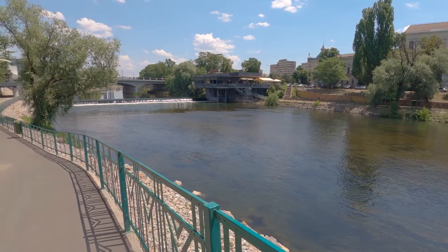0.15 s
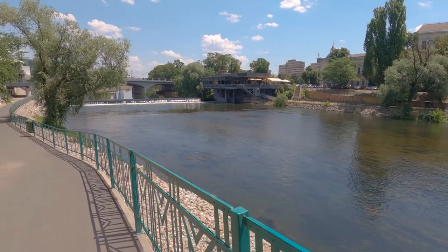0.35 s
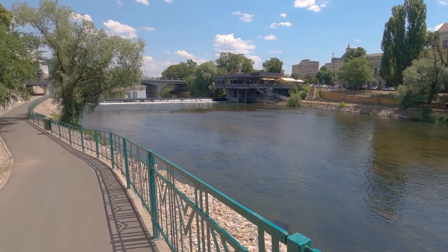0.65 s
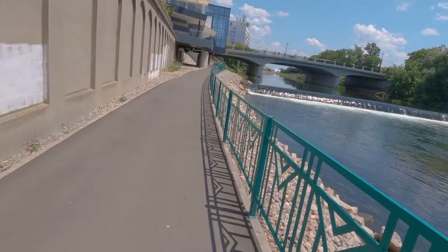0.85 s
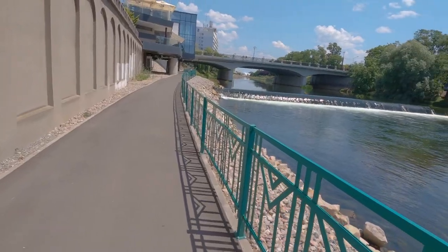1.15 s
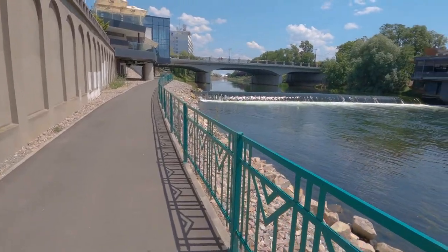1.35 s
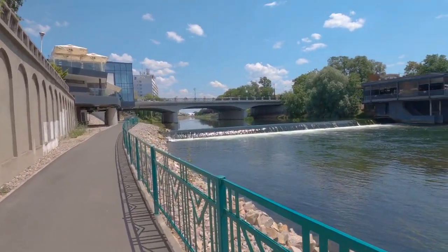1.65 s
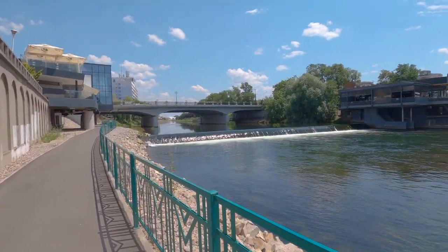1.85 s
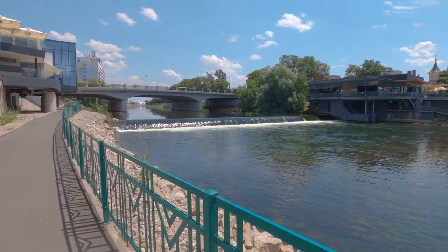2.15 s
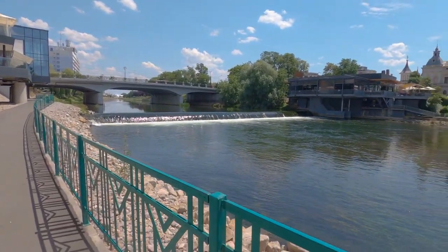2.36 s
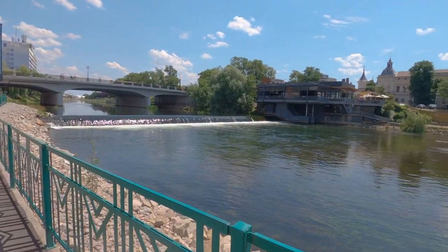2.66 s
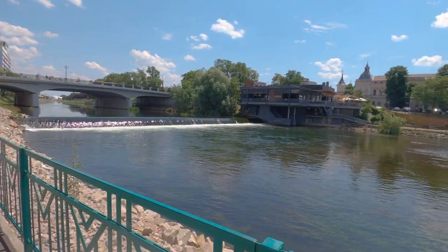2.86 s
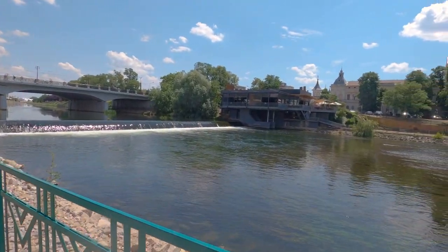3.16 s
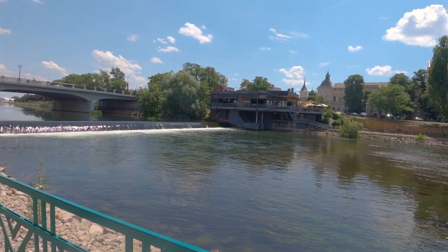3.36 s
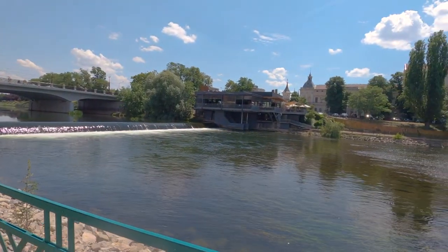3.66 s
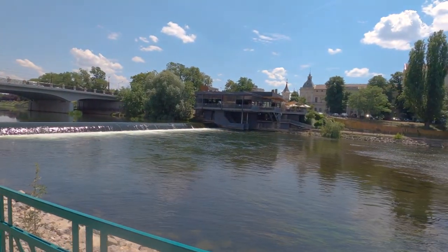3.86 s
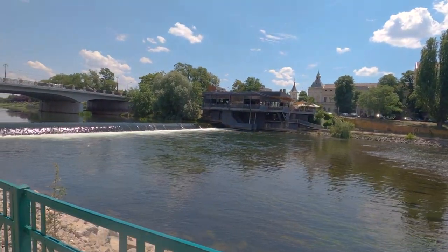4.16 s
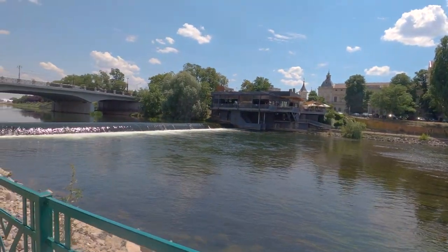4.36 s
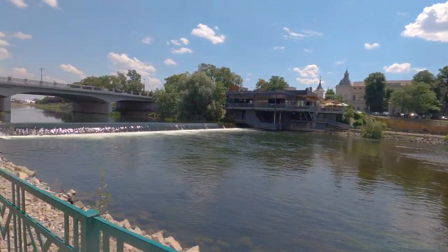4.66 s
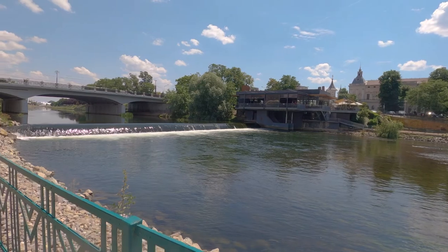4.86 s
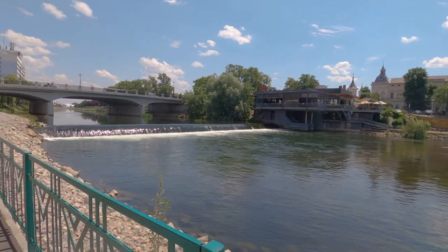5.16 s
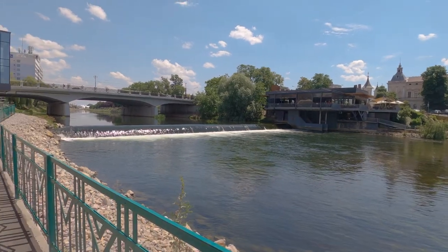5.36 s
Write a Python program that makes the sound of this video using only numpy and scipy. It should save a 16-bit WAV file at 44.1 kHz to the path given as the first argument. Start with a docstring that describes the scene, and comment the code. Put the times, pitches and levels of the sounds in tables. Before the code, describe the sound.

For the first 0.8 seconds, a river weir is heard from a distance as a thin, dull rush over low town rumble. The sound falls to near-silence, then at about 1 second the weir fades in quickly, much closer: a smooth roar of water with fizzing spray above it. It opens loud and bright and settles to a steady, lower level by about 2.5 seconds. Beneath it, traffic rumbles and an engine on a bridge holds a low, wavering drone, strongest around 2 seconds and again near 3.6. At about 1.2 seconds a brief scuffing swish passes nearby with one dry tick. A very faint, short high pip sounds at about 4 seconds. The traffic rumble swells briefly three times between 4.3 and 5 seconds, while the water grows very slightly louder until the end at about 5.5 seconds.

```python
"""A city river. From the far bank, town rumble and the thin rush of a weir, dulled by air absorption.
After a short near-silence the walker stands closer: countless bubbles merge into a roar, spray fizzes,
and an engine on the bridge drones at its firing frequency over traffic rumble. The near sound opens
loud and bright, then settles. A swish with a dry tick passes early on, a faint high pip later."""
import sys
import numpy as np
from scipy import signal
from scipy.io import wavfile
from scipy.ndimage import uniform_filter1d

SR = 44100
rng = np.random.default_rng(int(sys.argv[2]) if len(sys.argv) > 2 else 0)


def persist_wave(psi):
    """Save psi, clipped to +-1, as 16-bit WAV."""
    counts = np.round(np.clip(psi, -1, 1) * 32767).astype(np.int16)
    wavfile.write(sys.argv[1], SR, np.atleast_2d(counts).T)


N = 242991
T = np.arange(N) / SR
FAR_END_S, NEAR_START_S = 0.7712, 0.948


def gain_of(db):
    """Amplitude ratio of a level: a factor of ten per 20 dB."""
    return 10 ** (np.asarray(db) / 20)


def unit_rms(x):
    """Normalisation to unit mean power."""
    return x / np.sqrt(np.mean(x ** 2) + 1e-20)


def level_at(spectrum, hz):
    """Level in dB, interpolated on a logarithmic frequency axis."""
    f, db = np.transpose(spectrum)
    return np.interp(np.log(hz + 1), np.log(f + 1), db)


def resonate(x, hz, width):
    """Resonance by heterodyning: shift hz down to zero, low-pass, shift back."""
    carrier = np.exp(2j * np.pi * np.cumsum(hz * np.ones(len(x))) / SR)
    pole = np.exp(-np.pi * width / SR)
    return 2 * (carrier * signal.lfilter([1 - pole], [1, -pole], x / carrier)).real


def band(x, hz, width):
    """Three equal resonances in cascade give a steep pass band."""
    return resonate(resonate(resonate(x, hz, width), hz, width), hz, width)


def settle(db, extra_db, hold_s, tau_s):
    """Gain whose excess level holds as the near sound opens, then relaxes exponentially."""
    return gain_of(db + extra_db * np.exp(-np.maximum(T - NEAR_START_S - hold_s, 0) / tau_s))


def bumps(rows, half_s):
    """Superposed Gaussian changes of level, in dB."""
    return sum(db * np.exp(-((T - s) / half_s) ** 2) for s, db in rows)


# Passing coloration as the near water opens: f/Hz, gain/dB
OPENING_COLOUR = [(100, -6.5), (300, 1.5), (560, -4), (900, 0), (1500, 0.4), (2150, 2), (2600, 3),
                  (4500, 3.5), (5500, 8), (7000, -0.8), (8000, -2.5), (10300, -1), (11000, -7),
                  (14000, -14)]

def rush(*spectra, size, patchy_db=0, flicker_db=0, opens=False):
    """Spectrally shaped Gaussian noise, modulated by drifting patches and a broadband flicker."""
    hop = size // 4
    hz = np.fft.rfftfreq(size, 1 / SR)
    t = np.arange(N // hop + 5) * hop / SR
    real, imag, patches = rng.standard_normal((len(t), len(hz), 3)).T
    patches = uniform_filter1d(patches, size=size // 100, axis=0)
    patches = unit_rms(uniform_filter1d(patches, size=3000 // hop, axis=1))
    db = sum(level_at(spectrum, hz) for spectrum in spectra)[:, None]
    db = db + patchy_db * patches + flicker_db * rng.standard_normal(len(t))
    if opens:
        db += level_at(OPENING_COLOUR, hz)[:, None] * np.exp(-np.maximum(t - NEAR_START_S, 0) / 0.88)
    _, noise = signal.istft((real + 1j * imag) * gain_of(db), nperseg=size, noverlap=size - hop)
    return unit_rms(noise[:N])


# Spectra of the distant roar and of town rumble: f/Hz, relative level/dB
FAR_ROAR_SPECTRUM = [(44, -29.5), (80, -8), (100, -15.5), (125, -4.5), (170, -8.5), (340, -9.5),
                     (490, -20.5), (740, -6.5), (900, -11), (1130, -20), (1380, -17.5), (1850, -33),
                     (2170, -29.5), (2500, -41.5), (3200, -70.5), (5500, -120)]
RUMBLE_SPECTRUM = [(10, -36), (20, -14), (32, -5), (52, -1), (66, 0), (90, -12), (130, -38.5), (400, -120)]
# The water's high hiss as coloured by the microphone, shared by both places: f/Hz, relative level/dB
TREBLE_COLOUR = [(1100, -37), (1900, -20.5), (2500, -3), (4600, -1.16), (5250, -11.5), (6000, -15.5),
                 (7150, -11), (8060, -19.5), (8750, -14.5), (9900, -22.5), (10800, -28), (12300, -27.5),
                 (14200, -45), (14900, -55)]
# Treble loss over the long path: f/Hz, gain/dB
AIR_ABSORPTION = [(2000, -0.8), (6000, 0.5), (8500, -6), (10100, -3.5), (10700, -12), (12500, -14.5),
                  (13000, -23)]

def far_bank():
    """Ground-echo interference notches the roar and air absorption dulls the fizz, over town rumble."""
    roar = rush(FAR_ROAR_SPECTRUM, size=2048)
    fizz = rush(TREBLE_COLOUR, AIR_ABSORPTION, size=512, patchy_db=0.5, flicker_db=0.8)
    rumble = rush(RUMBLE_SPECTRUM, size=4096, patchy_db=1.0, flicker_db=3.1)
    return gain_of(-35) * roar + gain_of(-55.5) * fizz + gain_of(-37.5) * rumble


# Spectrum of the roar close by: f/Hz, relative level/dB
NEAR_ROAR_SPECTRUM = [(56, -32), (90, -8.5), (118, -9.5), (168, -8.5), (284, -12.5), (440, -11),
                      (570, -14.5), (780, -11.5), (950, -16.5), (1250, -22), (1600, -26), (1860, -36),
                      (2170, -31), (2400, -46), (3100, -69), (5500, -120)]

def weir():
    """Incoherent summation: countless bubbles merge into a smooth roar, with spray fizzing above."""
    roar = rush(NEAR_ROAR_SPECTRUM, size=2048, patchy_db=0.6, flicker_db=0.52, opens=True)
    roar *= settle(db=-29, extra_db=7.5, hold_s=0.23, tau_s=0.5)
    fizz = rush(TREBLE_COLOUR, size=512, patchy_db=0.54, flicker_db=0.63, opens=True)
    fizz *= settle(db=-48.5, extra_db=8, hold_s=0.13, tau_s=0.46)
    approach = gain_of(0.6 * np.maximum(T - 4.15, 0))  # 0.6 dB/s as the walker comes closer
    return approach * (roar + fizz)


# Wavering firing tone: t/s, f/Hz, level/dB
FIRING_TONE = [(1.0, 82.5, -29), (1.13, 87.7, -26.5), (1.37, 87.1, -26), (1.6, 82.7, -31),
               (1.77, 84.3, -25.5), (2.03, 83.34, -22.5), (2.36, 83.4, -25), (2.55, 82.6, -32),
               (3.12, 82.7, -32), (3.62, 83.8, -24), (3.78, 83.8, -28.5), (3.98, 85.2, -26.5),
               (4.65, 85.8, -28.5), (5.1, 87, -31), (5.51, 87, -30.5)]
# Brief dips in that tone: t/s, gain/dB
TONE_DIPS = [(1.23, -18), (1.47, -12), (1.61, -13), (1.88, -4), (2.17, -9), (2.87, -12.5), (3.71, -7),
             (4.79, -10), (5.28, -12), (5.44, -8)]

def engine():
    """Periodic firing gives a tone; uneven running spreads a skirt of noise sidebands around it."""
    times, pitches, levels = np.transpose(FIRING_TONE)
    hz = np.interp(T, times, pitches)
    db = np.interp(T, times, levels) + bumps(TONE_DIPS, half_s=0.036)
    tone = np.sqrt(2) * np.sin(2 * np.pi * np.cumsum(hz) / SR)
    skirt = resonate(rng.standard_normal(N), hz, width=13)
    skirt = unit_rms(resonate(skirt, hz, width=13))
    return gain_of(db) * tone + gain_of(-44) * skirt


# Brief swells of the rumble: t/s, gain/dB
TRAFFIC_SWELLS = [(1.14, 4.5), (4.3, 5.5), (4.72, 5), (5.0, 5)]

def traffic():
    """Low-frequency traffic noise, amplitude-modulated by brief swells."""
    rumble = rush(RUMBLE_SPECTRUM, size=4096, patchy_db=1.3, flicker_db=1.0)
    swells = gain_of(bumps(TRAFFIC_SWELLS, half_s=0.058))
    return settle(db=-36.5, extra_db=5, hold_s=0.44, tau_s=0.5) * swells * rumble


# Noise bands of a scuff: f/Hz, stage bandwidth/Hz, relative level/dB, delay/s
SCUFF_BANDS = [(1570, 360, -4, .001), (2120, 230, 2, .001), (4300, 1600, 1.5, 0.009), (5230, 350, -6, .005),
               (5520, 310, -2.5, .001), (6900, 830, -10, 0.014), (9000, 2600, -14.5, 0.033),
               (11800, 1800, -25, 0.081)]

def swish(start_s=1.218, rise_s=0.035, hold_s=0.05, fall_s=0.093):
    """Friction noise of a nearby scuff: grainy bands that rise and fall on Gaussian flanks."""
    n = 2 * SR
    grit = unit_rms(uniform_filter1d(rng.standard_normal(n), size=200))
    friction = rng.standard_normal(n) * gain_of(1.2 * grit)
    scuff = np.zeros(n)
    for hz, width, db, delay in SCUFF_BANDS:
        t = T[:n] - start_s - delay
        flank = np.minimum(t, 0) / rise_s + np.maximum(t - hold_s, 0) / fall_s
        scuff += np.exp(-flank ** 2) * gain_of(db) * unit_rms(band(friction, hz, width))
    return gain_of(-44) * np.pad(scuff, (0, N - n))


# Resonances of the tick: f/Hz, stage bandwidth/Hz, peak level/dB
TICK_RESONANCES = [(1560, 410, -22), (7000, 1200, -40), (8750, 1200, -41), (11700, 2600, -47)]

def tick(start_s=1.2562):
    """The impulse response of heavily damped resonances is one dry tick."""
    impulse = signal.unit_impulse(N, round(start_s * SR))
    click = np.zeros(N)
    for hz, width, db in TICK_RESONANCES:
        ring = band(impulse, hz, width)
        click += gain_of(db) * ring / abs(ring).max()
    return click


# Faint high tone burst: t/s, f/Hz, half width/s, peak level/dB
TONE_BURST = [(4.04, 5550, 0.013, -57)]

def pip():
    """A Gaussian envelope on a sinusoid gives a soft-edged, narrow-band blip."""
    return sum(gain_of(db) * np.exp(-((T - s) / half_s) ** 2) * np.sin(2 * np.pi * hz * T)
               for s, hz, half_s, db in TONE_BURST)


def scene():
    """Two places in turn: the far bank stops in a faint wisp, then the near sources fade in together."""
    wisp = gain_of(-30) * np.clip(1 - (T - FAR_END_S) / 0.018, 0, 1)
    far = far_bank() * np.where(T < FAR_END_S, 1, wisp)
    fade_in = np.clip((T - NEAR_START_S) / 0.09, 0, 1) ** 1.4
    near = weir() + engine() + traffic() + swish() + tick() + pip()
    return (far + fade_in * near)[None]


def record(dry):
    """Linear-phase low-pass at 14.9 kHz; mirrored ends let the filter run in smoothly."""
    taps = signal.firwin(511, 14900, window=("kaiser", 9), fs=SR)
    mirrored = np.pad(dry[0], 255, "reflect", reflect_type="odd")
    return signal.oaconvolve(mirrored, taps, "valid")[None]


dry = scene()
out = record(dry)
persist_wave(out)
```